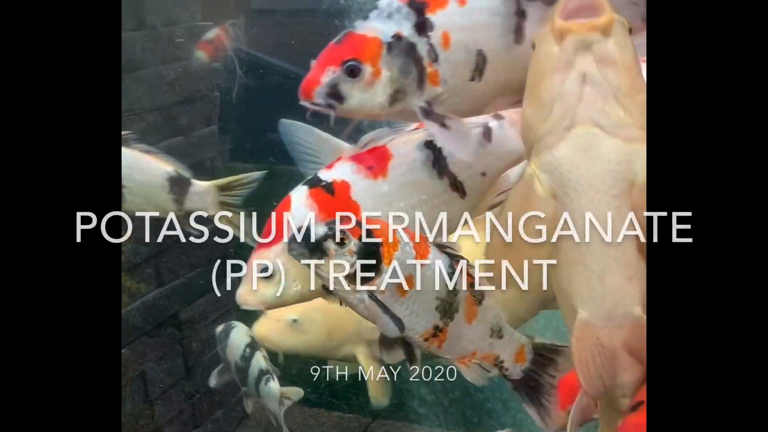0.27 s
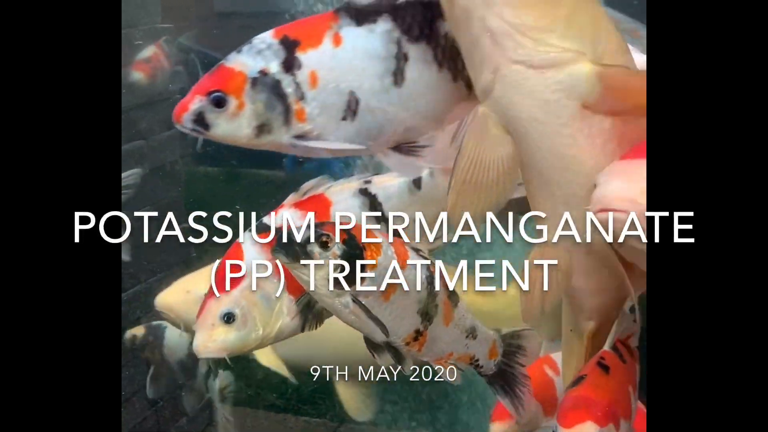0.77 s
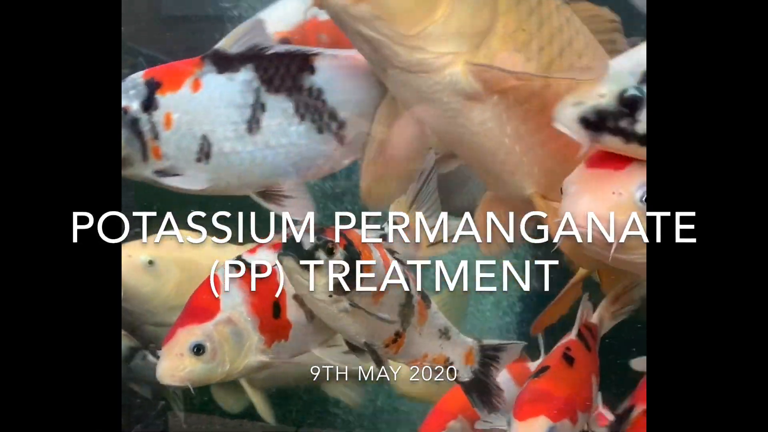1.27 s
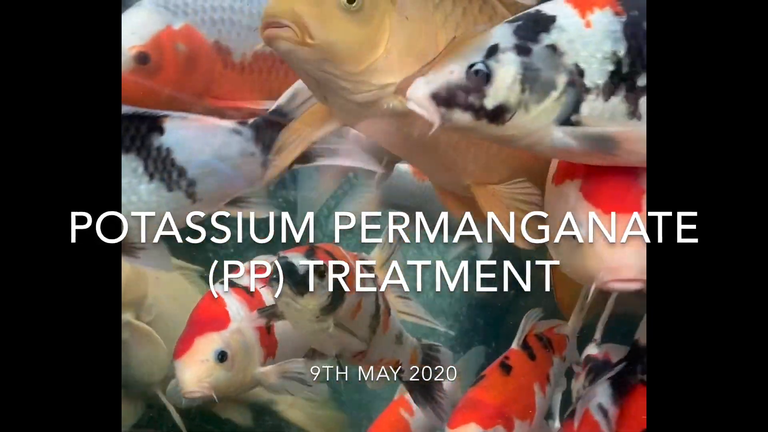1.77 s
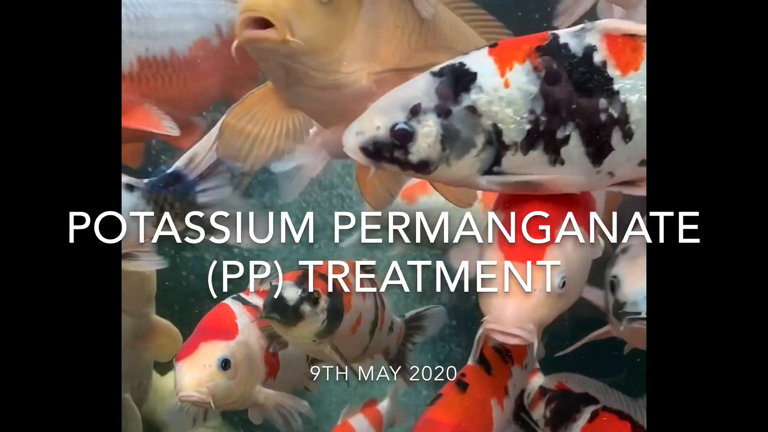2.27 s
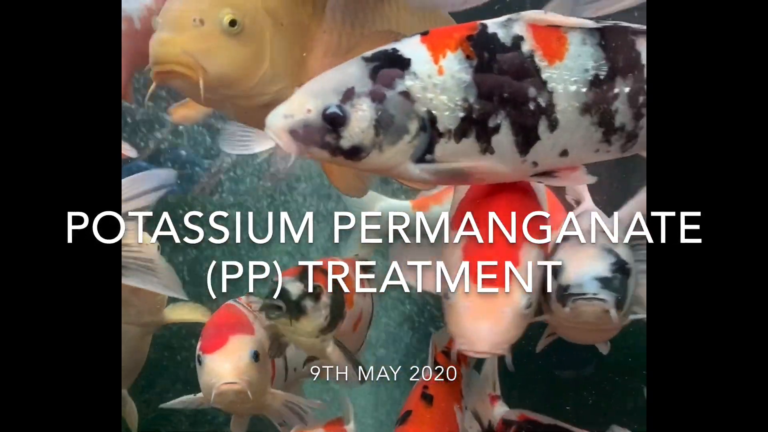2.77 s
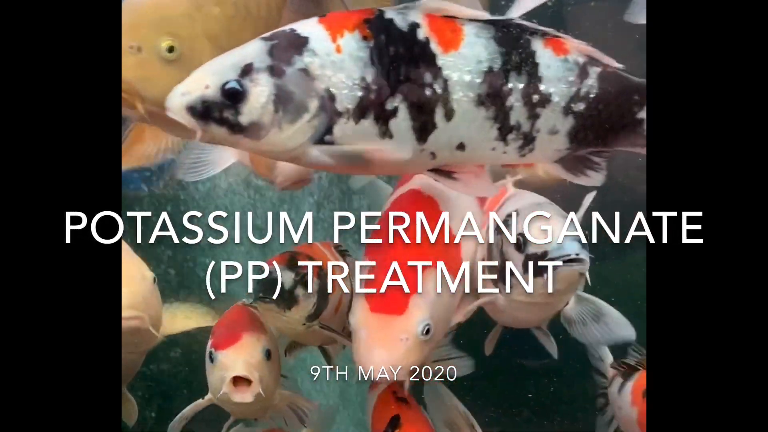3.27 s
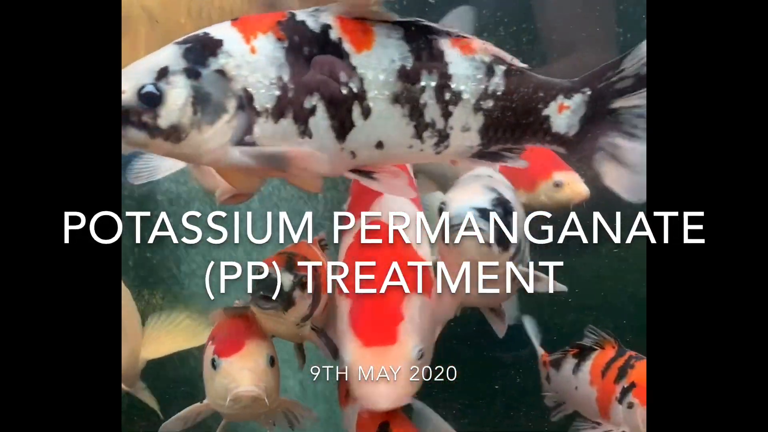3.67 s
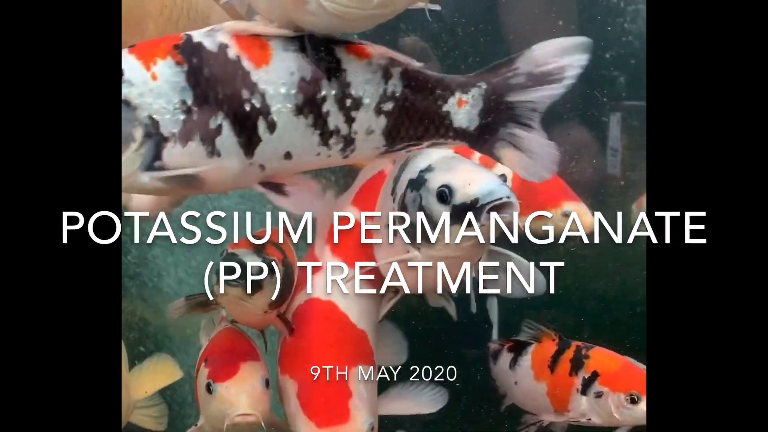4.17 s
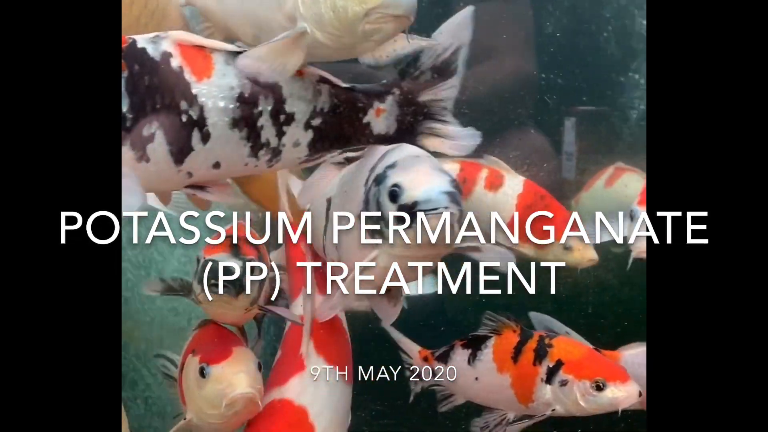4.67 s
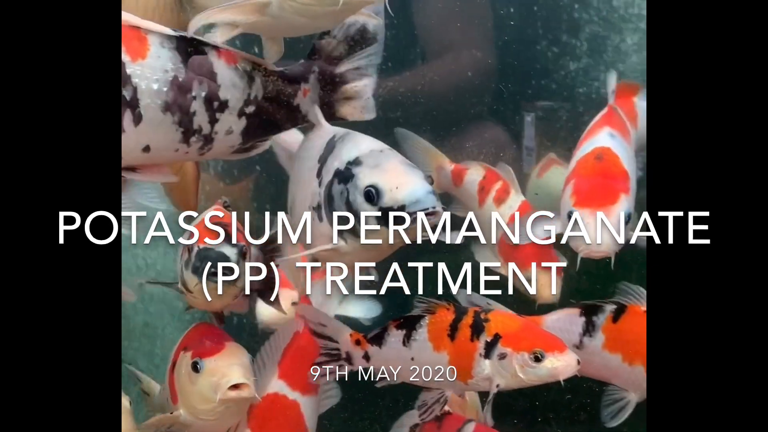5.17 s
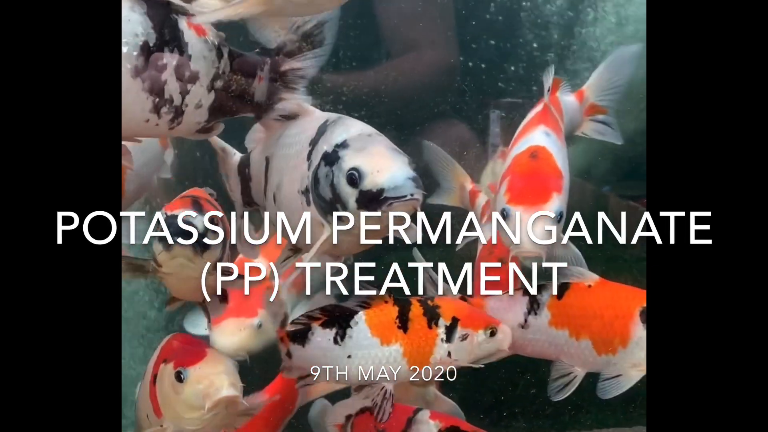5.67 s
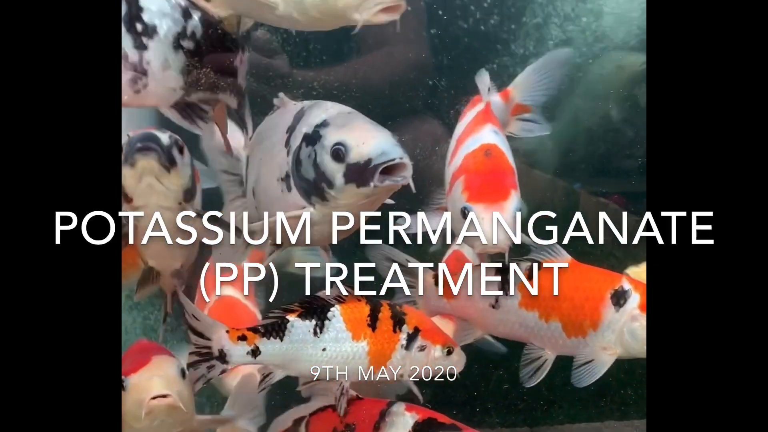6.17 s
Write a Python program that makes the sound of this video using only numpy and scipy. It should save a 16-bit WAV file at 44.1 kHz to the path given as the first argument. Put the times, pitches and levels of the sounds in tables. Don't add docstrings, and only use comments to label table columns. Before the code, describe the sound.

Aerated pond water rushes and gurgles continuously, with small bright splashes, thin wavering machine whines, distant engine drone and a few soft bumps.

```python
import sys
import numpy as np
from scipy import signal
from scipy.fft import rfft, irfft, next_fast_len
from scipy.io import wavfile
from scipy.ndimage import uniform_filter1d

SR = 44100
rng = np.random.default_rng(int(sys.argv[2]) if len(sys.argv) > 2 else 0)


def generate_wav(signal):
    frames = np.transpose(np.atleast_2d(signal))
    scaled = np.clip(frames, -1, 1) * 32767
    pcm = np.round(scaled).astype(np.int16)
    wavfile.write(sys.argv[1], SR, pcm)


def attenuation_scalar(level_db):
    decades = np.asarray(level_db, float) / 20
    return 10 ** decades


N = 283563
SPAN = next_fast_len(N)
T = np.arange(N) / SR
HZ = np.fft.rfftfreq(SPAN, 1 / SR)

# f/Hz, level/dB
RUMBLE_SPECTRUM = [(25, -43), (36, -26), (41, -5.5), (60, 1.5), (90, 0), (125, 0.5), (140, -7.5),
                   (200, -22), (300, -24)]
# t/s, firing f/Hz, first order level/dB, second order level/dB
ENGINE_SPEED = [(0, 43, -43.5, -50), (.5, 42.1, -50, -60.5), (1.3, 41.8, -50.5, -66), (1.5, 46, -51, -48),
                (1.7, 47.67, -52, -52.5), (2.1, 49.1, -47, -46), (2.2, 49.3, -40, -60),
                (2.5, 49.13, -44.5, -51), (3.1, 48.9, -44, -59), (3.3, 50.7, -60, -48.5),
                (3.6, 50.5, -45, -56), (4.15, 50.66, -47.5, -58.5), (4.35, 48.83, -85, -64),
                (4.6, 43.83, -48, -60), (5.3, 43.95, -52, -68), (5.8, 41.2, -50, -62),
                (6.43, 40.74, -51.5, -76)]
# t/s, peak level/dB, f/Hz, t60/s
BUMPS = [(1.081, -26.5, 92, 0.065), (1.386, -29.5, 240, 0.031), (2.18, -26, 61.4, 0.16),
         (3.23, -24.5, 65, 0.2), (4.145, -30.5, 95.7, 0.089), (4.516, -34.5, 260, 0.026),
         (4.53, -19, 109.9, 0.052), (4.599, -26, 95.6, .1), (4.735, -29.5, 79, 0.075),
         (5.03, -45, 134.5, 0.052), (5.921, -25, 65.3, 0.072)]
# start t/s, length t/s, level over its rest/dB
WHINE_SWELLS = [(.12, .45, 5), (.95, .47, 13), (1.72, .35, 4), (2.6, .3, 3), (3.15, .15, 6), (3.32, .2, 14),
                (3.76, .2, 7), (3.95, .24, 14), (4.42, .25, 5), (4.98, .08, 7), (5.17, .13, 13),
                (5.6, .42, 13), (6.18, .3, 13)]
# start t/s, length t/s, level over its rest/dB
MOAN_SWELLS = [
    (.3, 0.27, 11),
    (.85, .4, -6),
    (1.9, .3, 8),
    (3.5, .1, 7),
    (4.08, 0.28, 12),
    (4.5, 0.39, 7),
    (5.15, 0.19, 8),
    (5.75, 0.45, 11),
    (6.3, 0.19, 16),
]
# start t/s, length t/s, extra churning level/dB
SURGES = [
    (.35, .05, 0.5),
    (1.04, .11, 4),
    (1.37, .03, 1.5),
    (1.93, .27, 2.5),
    (2.38, 0.063, 1.5),
    (4.47, 0.084, 4),
    (4.74, 0.069, 3),
    (4.85, 0.22, 3),
    (5.78, 0.078, 2),
    (5.99, .14, 2.5),
]
# t/s, level over the steady hiss/dB, centre f/Hz, width f/Hz
SPLASHES = [(0.066, 9, 3270, 1100), (0.185, 8.5, 3670, 900), (0.431, 9, 8900, 1200),
            (0.782, 10.5, 3180, 900), (0.842, 14.5, 8050, 1100), (0.991, 11, 6460, 2600),
            (1.07, 8.5, 1590, 2480), (1.17, 9, 7040, 900), (1.557, 10.5, 7160, 1200),
            (1.977, 7, 6930, 2600), (2.06, 9, 8100, 1100), (2.75, 6, 6250, 1400), (3.09, 11.5, 10330, 1600),
            (3.2, 11, 10070, 2500), (3.432, 10.5, 5560, 2300), (3.598, 10, 11000, 1100),
            (3.9, 11.5, 4205, 900), (4.067, 12.5, 8360, 2100), (4.323, -9.5, 3460, 1900),
            (4.721, -2, 7020, 1600), (4.817, 9.5, 3780, 1400), (4.859, 9.5, 2000, 1500),
            (4.923, 14, 7100, 2000), (5.108, 10, 5700, 1100), (5.236, 10, 11230, 1100),
            (5.319, 12.5, 6070, 1100), (5.664, 11, 10930, 2100), (5.801, 14, 12400, 2800),
            (5.923, 11.5, 6570, 1200), (6.357, 10.5, 5810, 900)]
# f/Hz, level per Hz/dB
WATER_SPECTRUM = [(110, -81.5), (160, -70), (250, -76.5), (800, -80.5), (1200, -79.5), (1350, -87),
                  (2500, -89), (3800, -87), (5000, -87), (6900, -87), (7500, -91.5), (8300, -88.5),
                  (10200, -86.5), (15700, -97.5)]
# f/Hz, width f/Hz, level/dB
POCKETS = [(457, 21, 4.5), (723, 47, 2.5), (993, 320, 2.5), (1430, 105, 3.5), (1652, 26, 1.5),
           (2060, 157, 5), (3300, 700, 3.5), (10870, 1300, -4.5), (12000, 1900, 1)]
# f/Hz, likeness/0-1, left minus right level/dB, right port's lead beyond its lag/rad
PORTS = [(40, 0.95, 1.5, -0.04), (132, 1, 2, 0.25), (298, 0.8, 3.5, 1.4), (506, 0.39, 1.5, 0.57),
         (861, 0.6, 1, 2.16), (940, 0, 1.5, -1.8), (1100, 0.16, 0.5, 0.97), (1290, 0.47, -1.5, 0.97),
         (1620, 0.73, -1, -1.4), (2000, 0.85, -2, -0.59), (2210, 0.07, -4.5, -1.4),
         (2960, 0.85, -0.5, -1.03), (3320, 1, -4.5, -1.65), (3460, 0.96, 1.5, -1.19)]

SURGE_EDGE_S, SING_EDGE_S = 0.018, 0.046
BUBBLE_SIZES = 160


def evened(x):
    return x / np.sqrt(np.mean(x ** 2) + 1e-20)


def read(rows, at, log=False):
    x, *columns = np.transpose(rows)
    if log:
        x, at = np.log(x + 1), np.log(at + 1)
    return [np.interp(at, x, column) for column in columns]


def coloured(x, db):
    return irfft(rfft(x, SPAN) * attenuation_scalar(db), SPAN)[..., :N]


def wander(per_s_hz):
    return evened(coloured(rng.standard_normal(N), -20 * np.log10(1 + (HZ / per_s_hz) ** 2)))


def tone(hz, db):
    turns = np.cumsum(hz + 0 * T) / SR + rng.random()
    return np.sqrt(2) * attenuation_scalar(db) * np.sin(2 * np.pi * turns)


def swells(rows, t, edge_s):
    start, length, db = np.transpose(rows)[..., None]
    inside = np.minimum(t - start, start + length - t)
    return (db * np.clip(inside / edge_s + .5, 0, 1)).sum(0)


def add(mix, s, sound):
    part = mix[round(s * SR):][:len(sound)]
    part += sound[:len(part)]


def rumble():
    spectrum_db = read(RUMBLE_SPECTRUM, HZ, log=True)[0] - 60 * (HZ > 400)
    low = evened(coloured(rng.standard_normal((2, N)), spectrum_db))
    surge_db = 0.48 * swells(SURGES, T, SURGE_EDGE_S)
    lumps_db = 1.5 * wander(3.2)
    return low * attenuation_scalar(-46 + surge_db + lumps_db)


def engine():
    hz, first_db, second_db = read(ENGINE_SPEED, T)
    return tone(hz, first_db) + tone(2 * hz, second_db + 0.5 * wander(1.3))


def bumps():
    out, t = np.zeros(N), np.arange(9000) / SR
    for s, db, hz, t60 in BUMPS:
        swell = attenuation_scalar(db - 3.5 - 60 * t / (1.46 * t60)) * (1 - np.exp(-t / 0.0024))
        add(out, s, swell * np.sin(2 * np.pi * hz * t * (1 - 2.15 * t)))
    return out


def pump():
    hum = tone(131.15 + 0.26 * wander(1.27), -54 + 2.8 * wander(4.7))
    blades = tone(511.7 + 0.35 * wander(1.14), -70.5 + 2.5 * wander(2.2))
    return hum + blades


def whine():
    db = -69 + swells(WHINE_SWELLS, T, SING_EDGE_S) + 1.5 * wander(5.0)
    return tone(1160 + 1.31 * wander(2.0), db)


def air_line():
    db = -72 + swells(MOAN_SWELLS, T, SING_EDGE_S) + 3.4 * wander(16)
    return tone(1643 + 28 * wander(21.9), db)


def bubble(hz, cycles):
    turns = np.arange(int(5 * cycles * SR / hz)) / SR * hz
    swell = np.exp(-turns / cycles) * (1 - np.exp(-turns / 1.5))
    return swell * np.sin(2 * np.pi * turns * (1 + .0006 * turns))


def glugs():
    out, per_s = np.zeros(N), 120
    when, pitch, size = rng.random((int(per_s * N / SR), 3)).T
    when = when * N / SR
    size_db = 2.2 * np.minimum(-np.log(size + 1e-9), 3)
    size_db = size_db + 2.9 * swells(SURGES, when, SURGE_EDGE_S)
    for s, hz, db in zip(when, 300 * 5.0 ** pitch, size_db):
        add(out, s, attenuation_scalar(db) * bubble(hz, cycles=5.9))
    return attenuation_scalar(-20) * evened(out)


def bubbles(splashes):
    crowd, plops = np.zeros(N), np.zeros(N)
    per_s, walls_t60 = 500, 0.24
    pitches = 1500 * 8.2 ** np.sort(rng.random(BUBBLE_SIZES))
    kinds = [bubble(hz, cycles=23.0) * (hz / 4000) ** 0.31 for hz in pitches]
    for when, pitch, size in rng.random((int(per_s * N / SR), 3)):
        size_db = 2.8 * min(-np.log(size + 1e-9), 4)
        add(crowd, when * N / SR, attenuation_scalar(size_db) * kinds[int(pitch * BUBBLE_SIZES)])
    for s, db, hz, _ in splashes:
        add(plops, s, attenuation_scalar(1.4 * db - 13) * bubble(hz, cycles=28.0))
    near = attenuation_scalar(-11) * evened(crowd) + plops
    t = np.arange(6000) / SR
    echoes = rng.choice([-1., 1.], len(t)) * (rng.random(len(t)) < .05) * attenuation_scalar(-60 * t / walls_t60)
    echoes /= np.linalg.norm(echoes)
    return near + attenuation_scalar(1.5) * signal.oaconvolve(near, echoes)[:N]


def all_splashes():
    per_s, width_hz = 3, 1500
    when, size, pitch = rng.random((int(per_s * N / SR), 3)).T
    spits = np.transpose([when * N / SR, 4.5 + 3.7 * size, 2000 * 7.5 ** pitch, width_hz + 0 * when])
    return np.vstack([SPLASHES, spits])


def splash_power(splashes, t, hz):
    s, db, centre, width = splashes.T
    t60 = 0.063
    age = t - s[:, None]
    decay = attenuation_scalar(-120 * age.clip(0) / (3.5 * t60))
    onset = np.exp(age.clip(None, 0) / .0025)
    in_time = np.where(age > 0, decay, onset)
    narrow = np.exp(-4 * np.log(2) * ((hz - centre) / (1.4 * width)) ** 2)
    in_hz = attenuation_scalar(2 * (db - 7.0)) * (narrow + 0.43 * (hz > 1200))
    return in_hz @ in_time


def water():
    frames, hz = N // 64 + 5, np.fft.rfftfreq(256, 1 / SR)[:, None]
    t = np.arange(frames) * 64 / SR
    a, b, c, d, patches = rng.standard_normal((frames, 129, 5)).T
    patches = uniform_filter1d(uniform_filter1d(patches, size=7, axis=0), size=24, axis=1)
    patches = evened(patches)
    flicker = evened(uniform_filter1d(rng.standard_normal(frames), size=20))
    gurgle_db = swells(SURGES, t, SURGE_EDGE_S)
    spray_db = 0.21 * gurgle_db + 0.43 * np.interp(t, T, wander(0.67))
    high = np.clip(np.log2(hz / 650 + 1e-9) / 1.6, 0, 1)
    gurgle_depth = .5 + 0.92 * np.exp(-((hz - 450) / 250) ** 2)
    flicker_db = flicker * (1.18 + 0.072 * hz / 8000)
    field_db = (1 - high) * gurgle_depth * (gurgle_db - gurgle_db.mean())
    field_db += high * (spray_db - spray_db.mean() + 0.65 * patches + flicker_db)
    splashes = all_splashes()
    field = attenuation_scalar(field_db) * np.sqrt(1 + splash_power(splashes, t, hz))
    z = np.array([a + 1j * b, c + 1j * d]) * field
    hiss = evened(signal.istft(z, nperseg=256, noverlap=192)[1][:, :N])
    hiss[0] += bubbles(splashes) + glugs()
    pockets_db = sum(gain / (1 + (2 * (HZ - f) / width) ** 2) for f, width, gain in POCKETS)
    db = read(WATER_SPECTRUM, HZ, log=True)[0] + pockets_db
    return coloured(hiss * np.sqrt(SR / 2), db - .6)


def scene():
    direct, scattered = rfft(water() + rumble(), SPAN)
    solid = rfft(engine() + pump() + bumps() + whine() + air_line(), SPAN)
    lag_from_hz, lag_s = 4200, .000239
    far_row = (lag_from_hz, 0.97, 0, -2.278)
    same, balance_db, lead = read(PORTS + [far_row], HZ)
    same = np.clip(same, 0, 1)
    shift = np.exp(1j * (lead - 2 * np.pi * lag_s * np.maximum(HZ - lag_from_hz, 0)))
    left = direct + solid
    right = shift * (same * direct + solid) + np.sqrt(1 - same ** 2) * scattered
    pair = np.array([left * attenuation_scalar(balance_db / 2), right * attenuation_scalar(-balance_db / 2)])
    return irfft(pair, SPAN)[:, :N]


def low_pass(x):
    return signal.sosfilt(signal.butter(12, 15890, fs=SR, output="sos"), x)


def record(dry):
    edge_hz = 15770
    mix = coloured(dry, -100 * (HZ > edge_hz))
    return low_pass(mix)


dry = scene()
out = record(dry)
generate_wav(out)
```